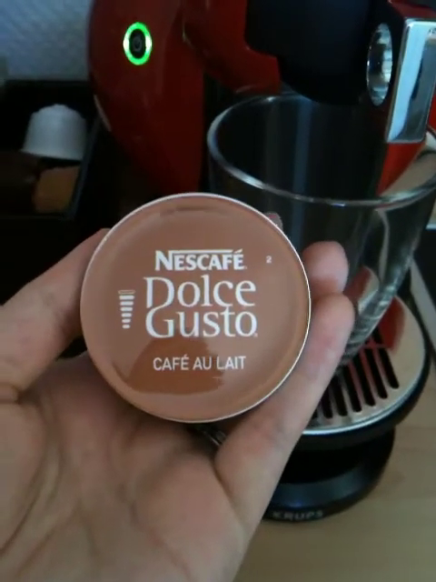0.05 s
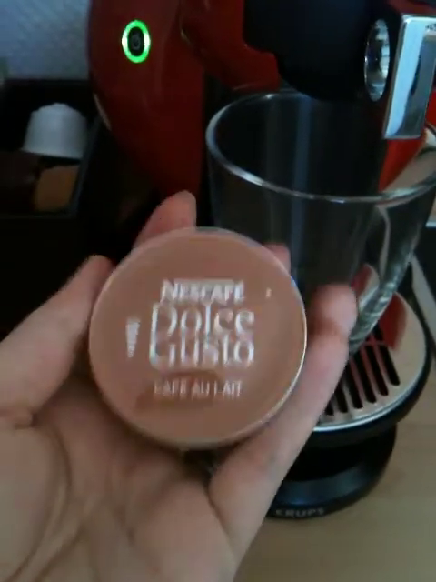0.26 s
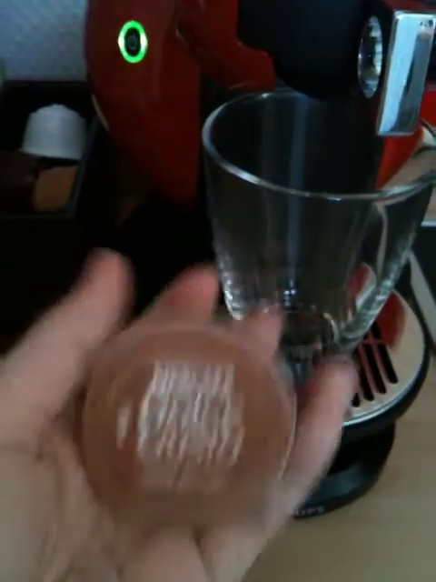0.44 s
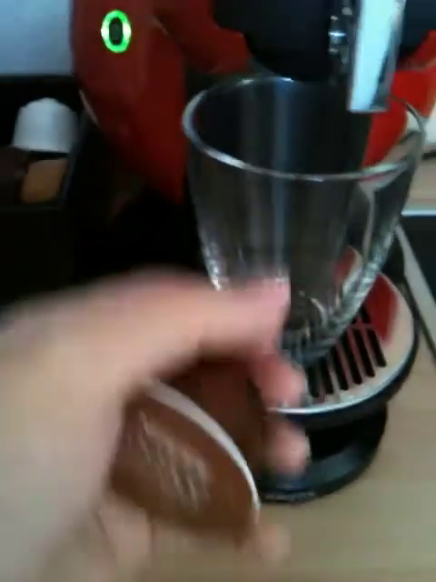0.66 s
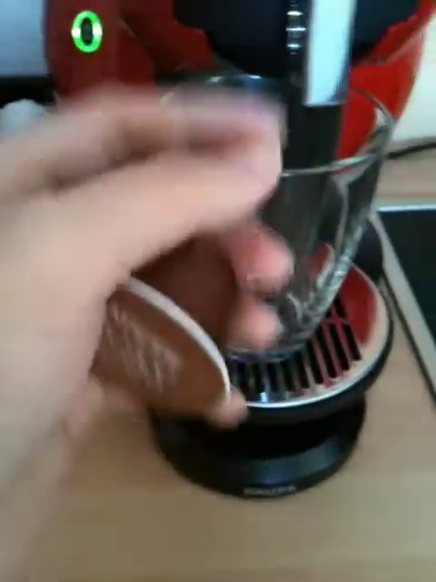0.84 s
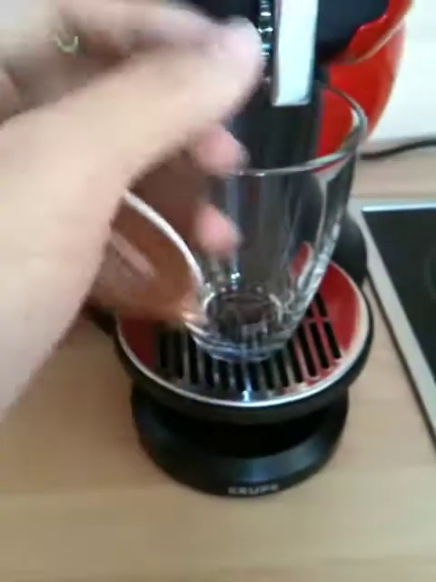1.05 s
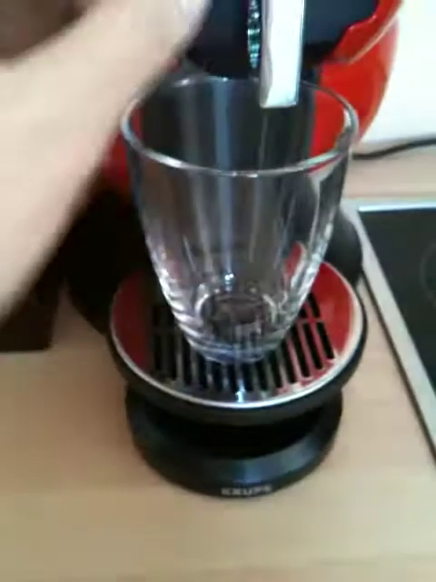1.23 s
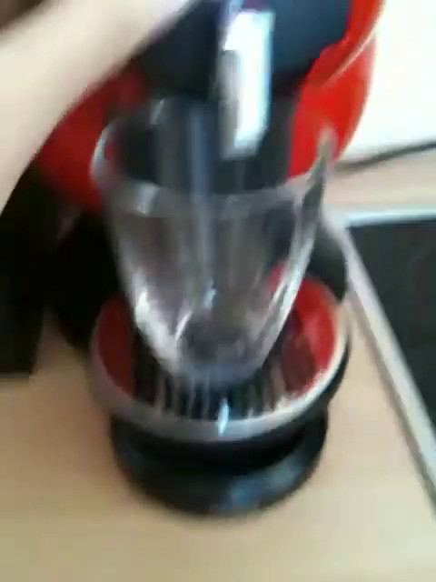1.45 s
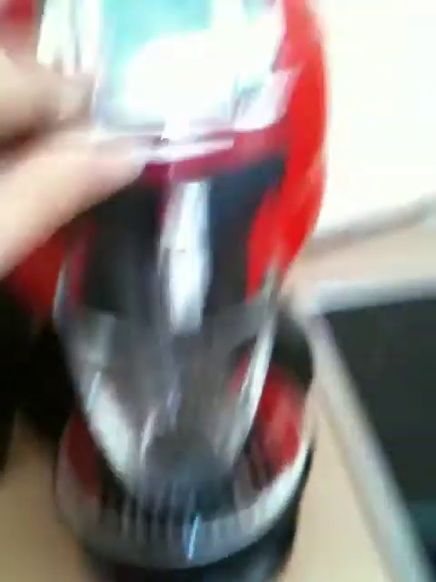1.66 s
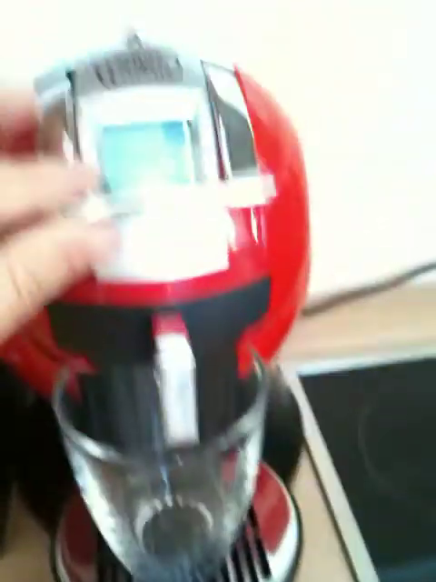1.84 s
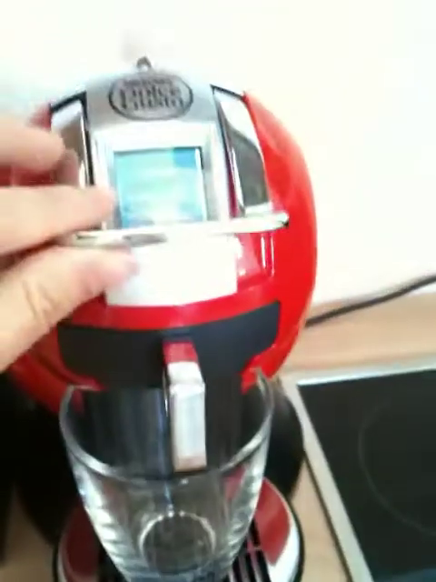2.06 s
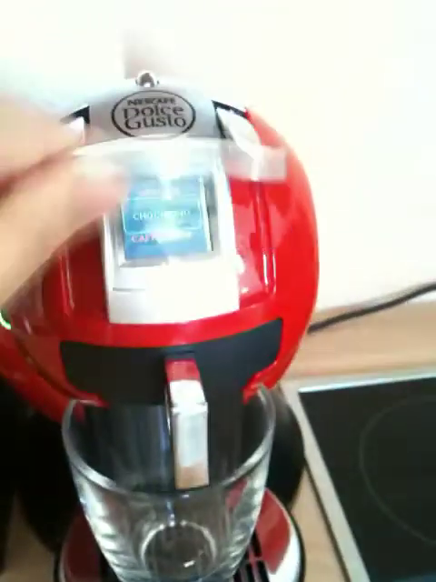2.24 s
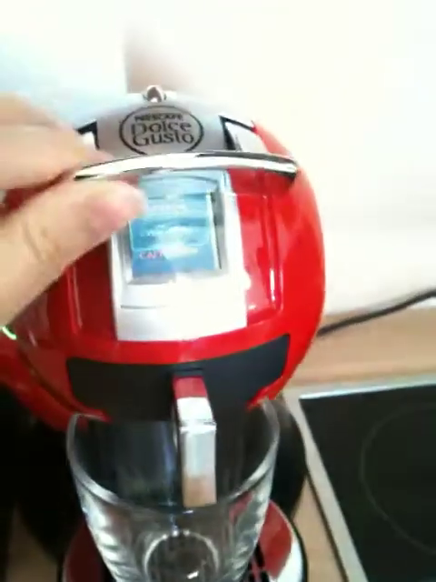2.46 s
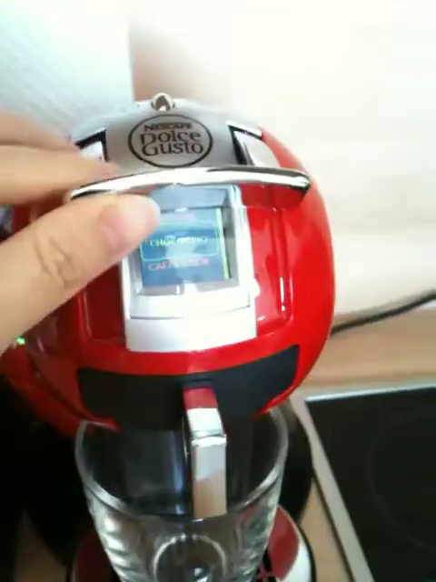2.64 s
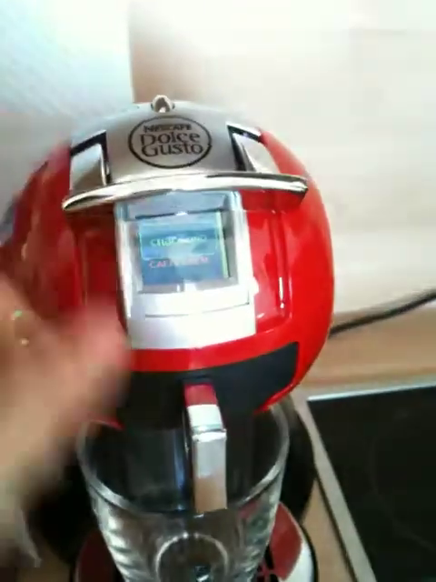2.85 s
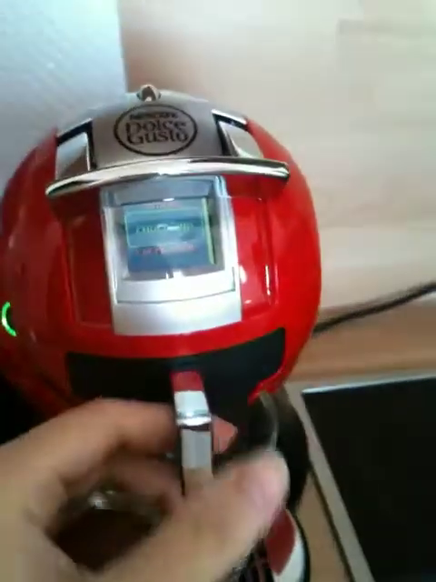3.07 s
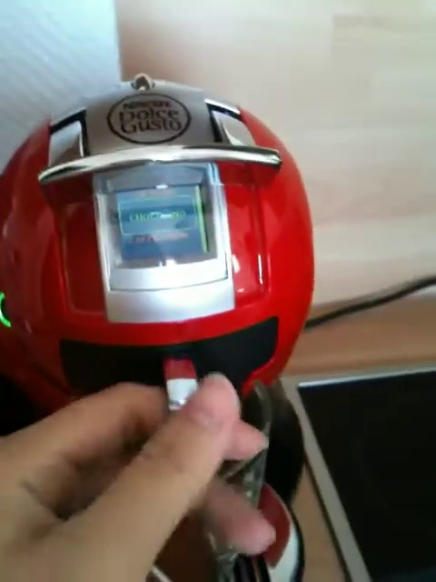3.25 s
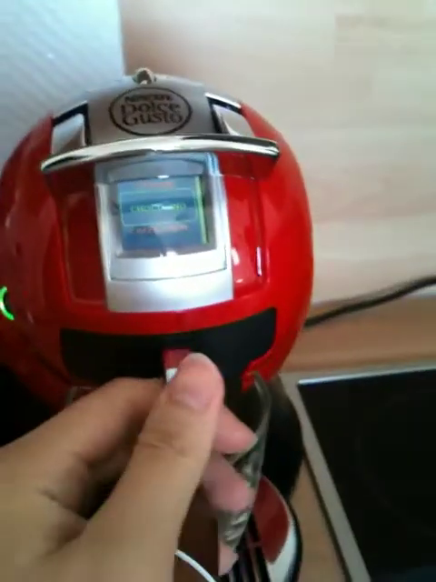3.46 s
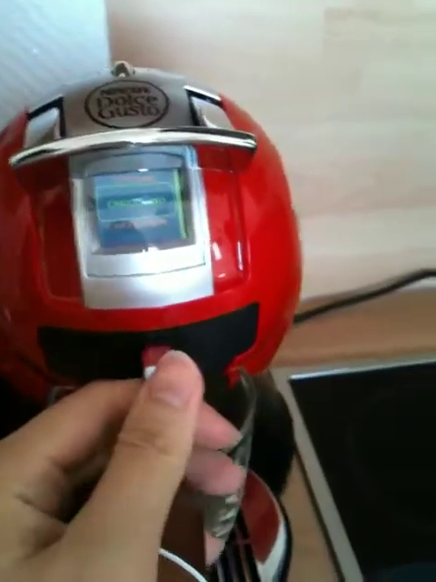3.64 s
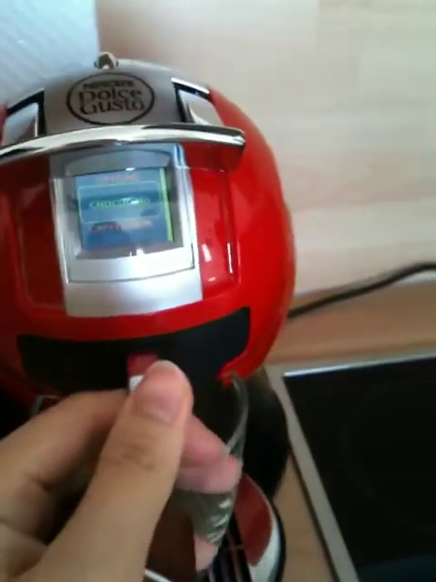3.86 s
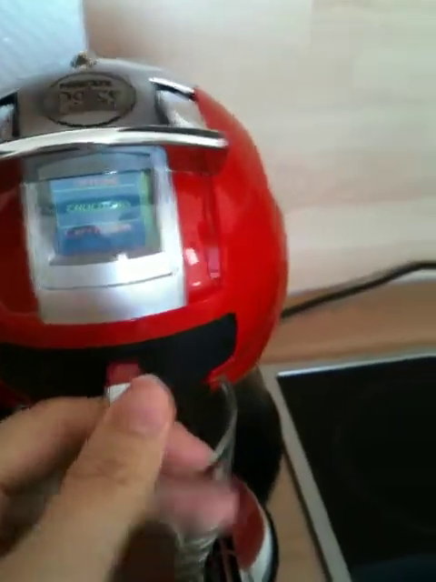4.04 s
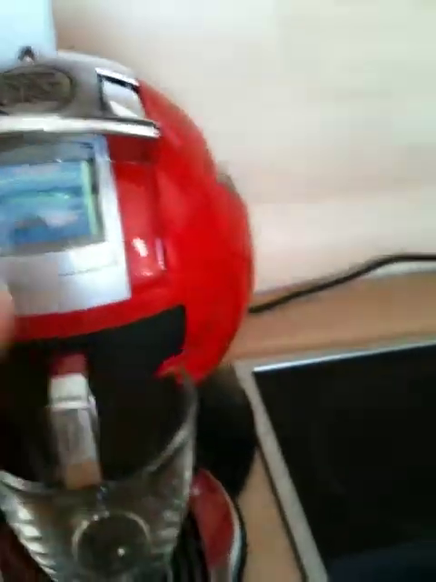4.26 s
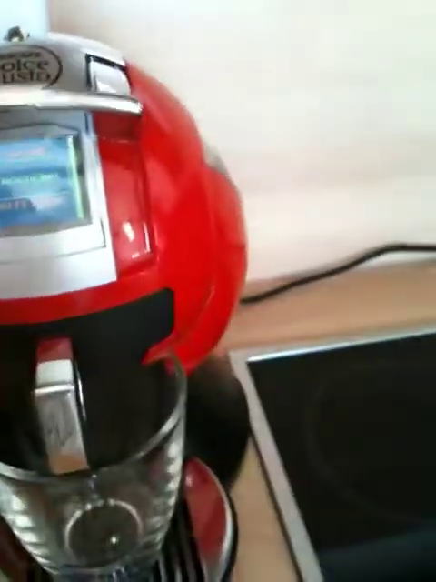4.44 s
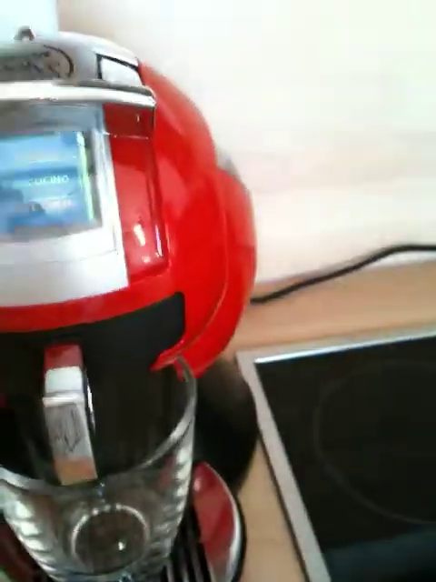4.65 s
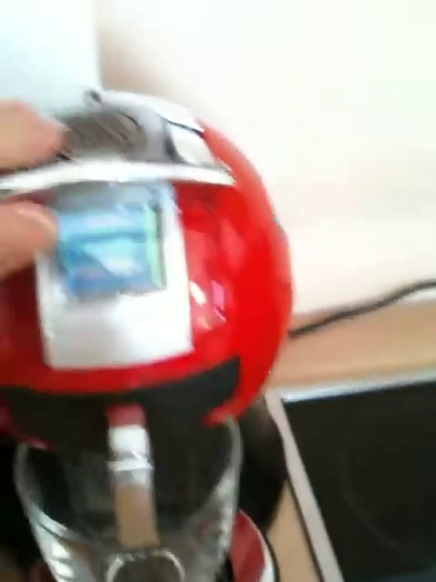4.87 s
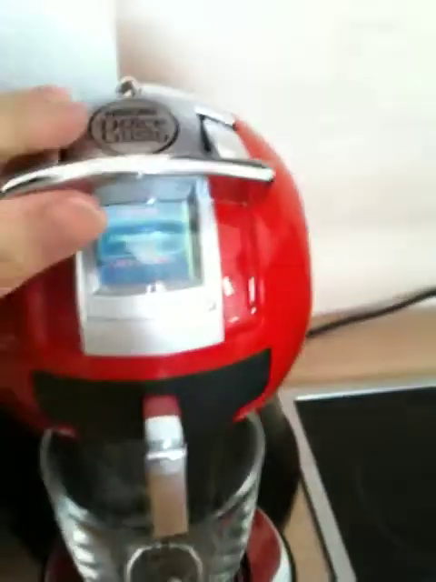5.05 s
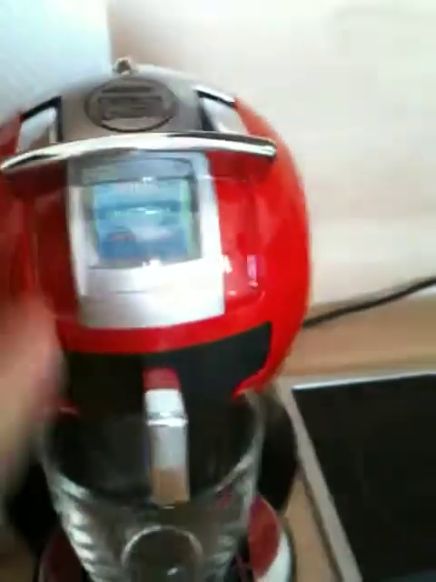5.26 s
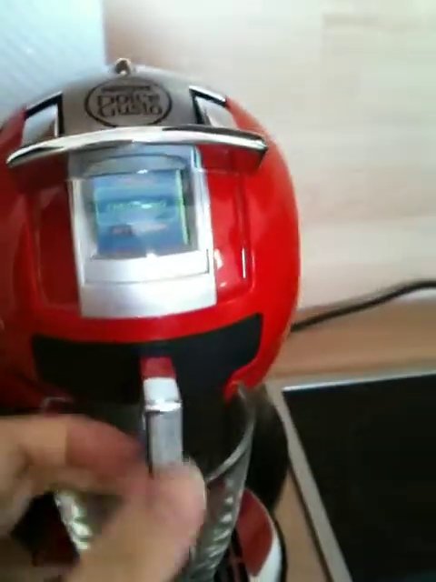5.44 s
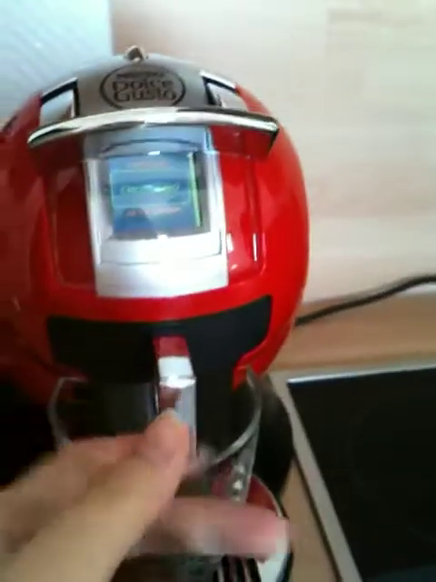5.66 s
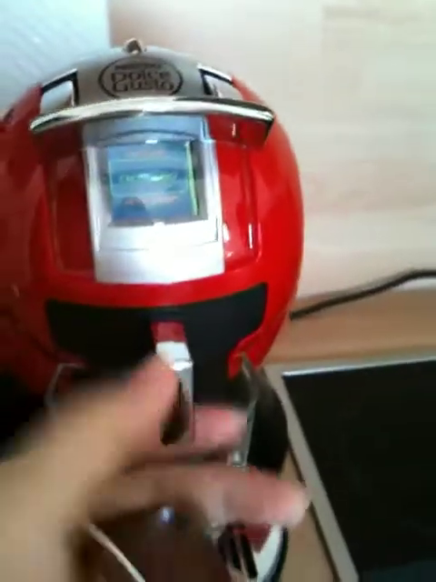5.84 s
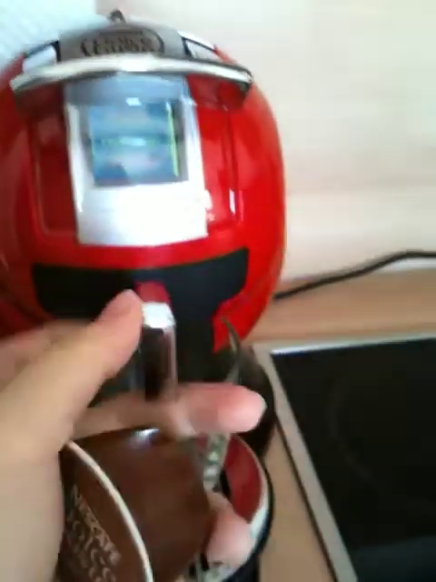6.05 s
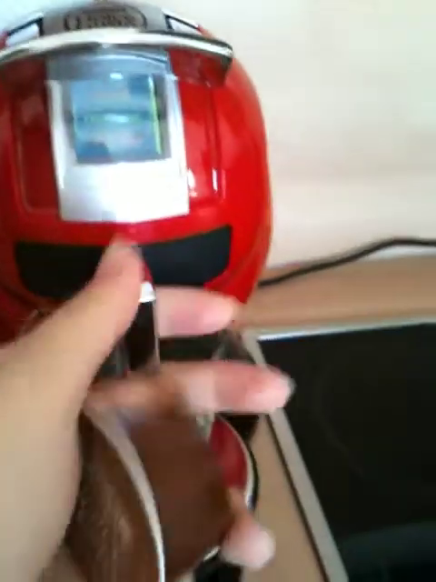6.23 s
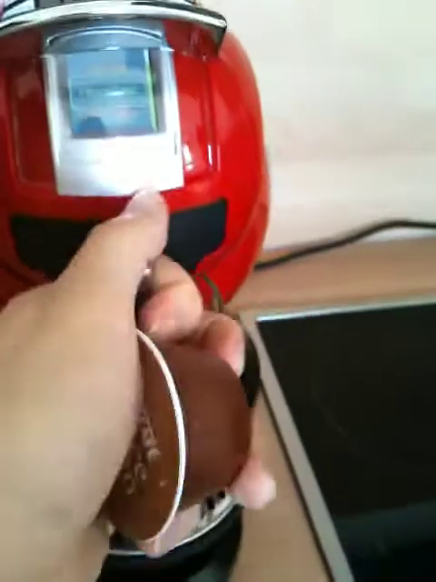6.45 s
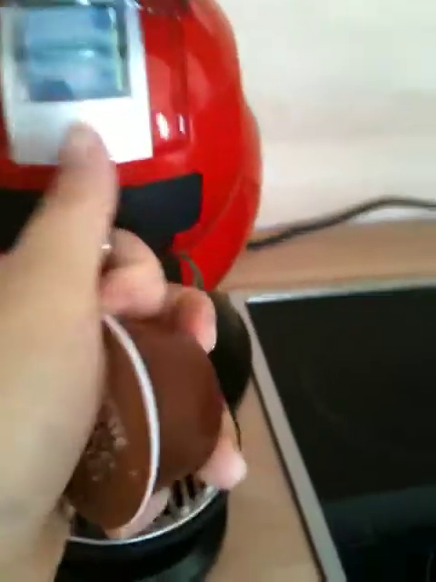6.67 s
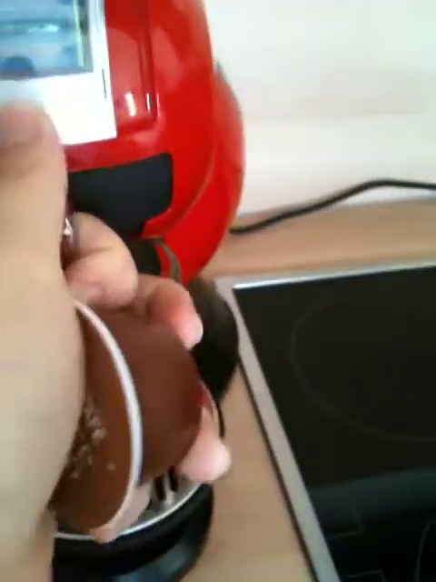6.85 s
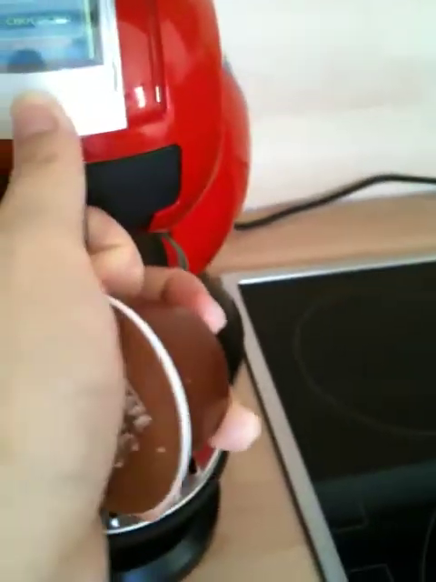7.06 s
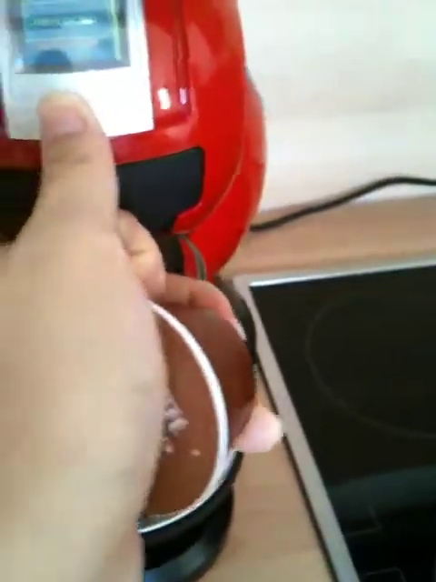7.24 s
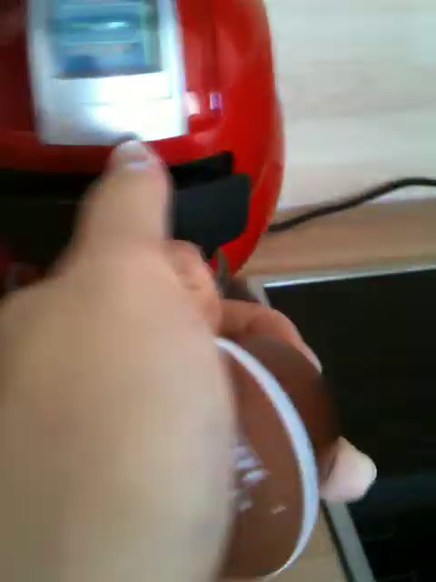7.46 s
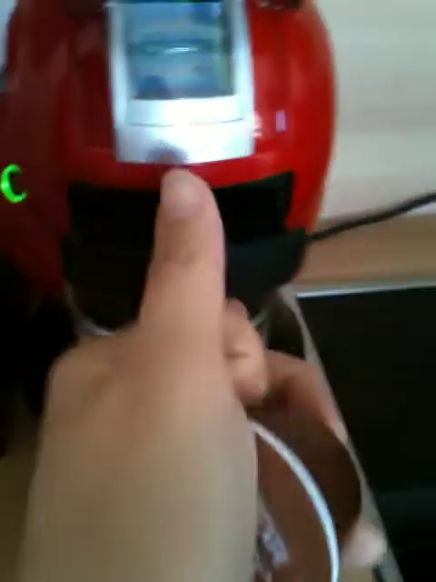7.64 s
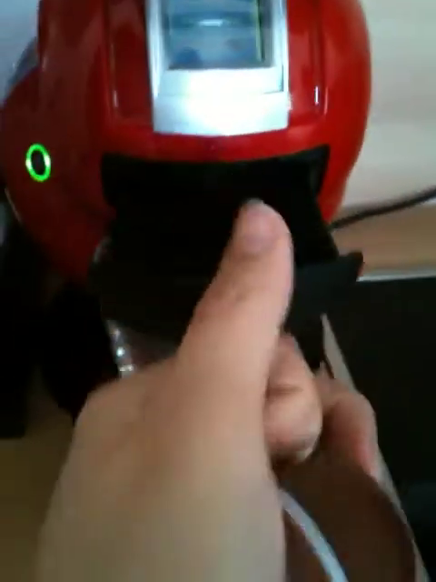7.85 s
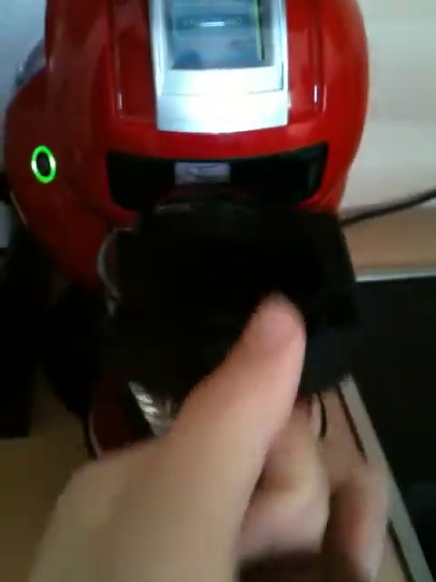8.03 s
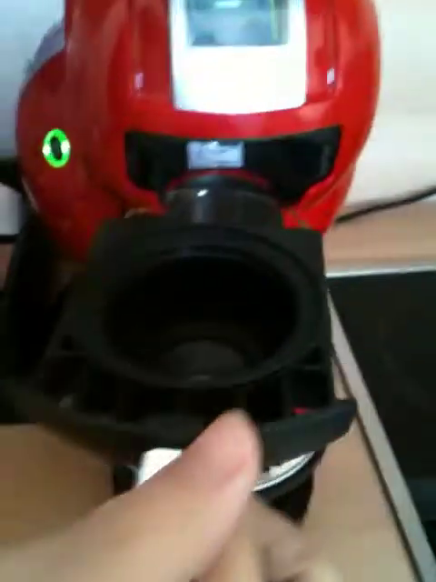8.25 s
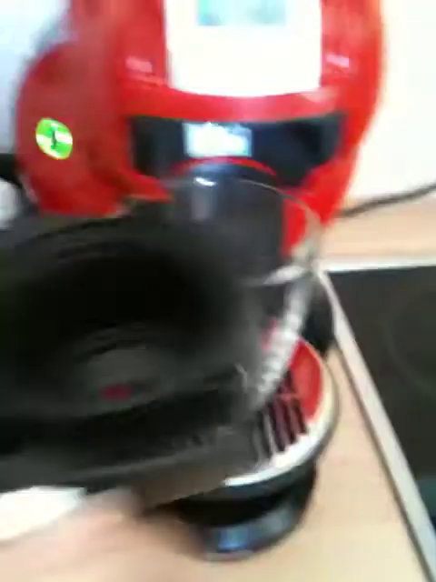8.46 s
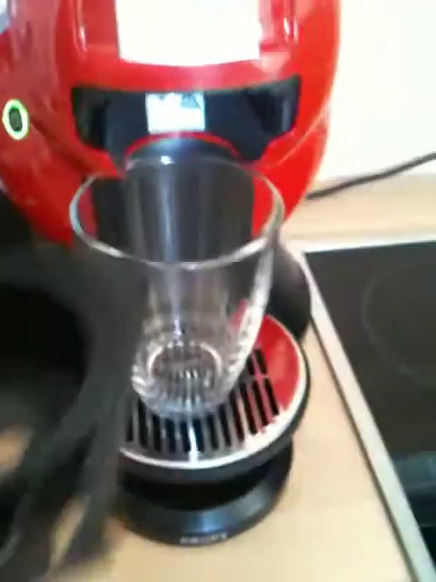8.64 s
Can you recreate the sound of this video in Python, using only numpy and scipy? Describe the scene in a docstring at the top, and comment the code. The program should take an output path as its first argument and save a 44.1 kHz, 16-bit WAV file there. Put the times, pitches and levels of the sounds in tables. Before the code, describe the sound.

A capsule coffee machine is handled very close to the microphone in a quiet kitchen, with faint steady hiss and a short room echo. From 0.3 to 0.9 seconds there are barely audible hand swishes. Light knocks around 1.5 to 1.8 precede a bright, hard plastic clack at 2.3 as the lever flips, with a brief scrape and small rattles. A single rap comes at 3.5, small ticks near 4.3, and faint knocks and rubbing until 6. Around 6.4 to 6.6 crisp clicks and a tiny creak sound as the handle is tried, followed by scattered light ticks and a twangy click at 7.2. At 7.45 the holder snaps loose, the loudest event: a cracking, hollow burst with a low jolt. More snaps and clacks follow at 7.6, then a soft drag, dull knocks at 8.0, and faint brushing to the end at 8.5.

```python
"""Plastic capsule coffee machine worked by hand

Close up in a kitchen, hands brush the machine, flip its top lever and try the holder's handle, which
clicks and scrapes; then the holder snaps free, rattles and slides out, and the machine jolts.
Blows mix a noise crack, damped plastic noise, ringing modes, a pitched ping and a hollow thump;
strokes are noise driven by tiny random slips. A short banded noise echo and a faint steady hiss surround them."""
import sys
import numpy as np
from scipy import signal
from scipy.fft import rfft, irfft
from scipy.io import wavfile

SR = 44100
rng = np.random.default_rng(int(sys.argv[2]) if len(sys.argv) > 2 else 0)


def wav_out(sig):
    """Save sig, one row per channel (or a flat mono array), as 16-bit PCM at SR to the path in sys.argv[1]."""
    wavfile.write(sys.argv[1], SR, np.round(np.clip(np.atleast_2d(sig).T, -1, 1) * 32767).astype(np.int16))


N = 383669  # samples, about 8.7 s

# Blows on lever, handle and holder. Each row: start in seconds, kind of contact, level in dB before the
# common trim, brightness in dB per octave, decay of the damped plastic in seconds (t60),
# thump in dB before the common trim, ping in Hz.
BLOWS = [ (1.543, "rap", -51, -0.5, .05, -73, 1220), (1.751, "click", -65.5, 15, 0.049, -60, 9400),
         (1.791, "knock", -45, 1, 0.033, -66, 720), (1.797, "knock", -46.5, -2.5, .13, -34.5, 1240),
         (1.82, "rap", -37, 1, 0.052, -73, 2660), (2.2887, "clack", -17.5, 1, 0.059, -29.5, 2550),
         (2.316, "clack", -33.5, -1, 0.13, -64, 2860), (2.366, "knock", -37, -0.5, 0.046, -48.5, 800),
         (2.384, "rap", -33, 4.5, .18, -54, 2820), (2.425, "tick", -41, 4.5, 0.087, -70, 2820),
         (2.792, "clack", -48.5, -0.5, 0.12, -57.5, 1410), (3.4791, "rap", -32.5, 0.5, .086, -46, 1025),
         (3.762, "knock", -64, -2.5, 0.03, -78, 1100), (4.2885, "tick", -40.5, -1, 0.092, -76, 3180),
         (4.295, "tick", -44, 2.5, .07, -72, 3230), (4.363, "tick", -37.5, 0.3, 0.05, -70, 3560),
         (4.557, "knock", -50, -1.5, 0.037, -44.5, 770), (4.6276, "knock", -43, 2, 0.032, -63, 1040),
         (4.7283, "click", -41, 0, 0.057, -73, 1530), (4.889, "tick", -55.5, 5.5, 0.061, -79, 4400),
         (5.226, "knock", -64, 8, .08, -50.5, 2770), (5.503, "knock", -56, -1, 0.038, -52, 1020),
         (5.849, "tap", -63.5, 0, 0.046, -74, 1900), (6.417, "tick", -35.5, 0, 0.078, -43.5, 2970),
         (6.478, "tick", -39, -1, .04, -70, 3750), (6.506, "tick", -37, -1.5, 0.031, -72, 3700),
         (6.5461, "click", -29, 2, 0.098, -65, 3500), (6.701, "knock", -48, 2.5, 0.09, -58, 3020),
         (6.806, "rap", -43, 0, 0.11, -67, 3140), (6.914, "tap", -57, -0.5, 0.035, -66, 1200),
         (7.0113, "tick", -40, .5, .084, -74, 2970), (7.1246, "tap", -50, -0.5, 0.052, -56.5, 1350),
         (7.1818, "twang", -31.5, 0, 0.041, -68, 2440), (7.366, "tick", -47.5, 1, 0.038, -73.5, 3840),
         (7.378, "tick", -42.5, 5, 0.057, -76, 4380), (7.4471, "click", -25, 1.5, 0.057, -58, 1520),
         (7.4495, "snap", -15, 1.5, .038, -20, 1416), (7.457, "rap", -10.5, -0.5, .17, -27, 1370),
         (7.4796, "snap", -21, -1.5, 0.1, -23.5, 2090), (7.615, "snap", -27.5, -1.5, 0.053, -55, 2570),
         (7.622, "clack", -32.5, -5, 0.18, -38.5, 2525), (7.707, "tap", -54, -5, 0.035, -61, 1380),
         (7.856, "tap", -45, -0.5, 0.057, -66, 1183), (7.902, "knock", -61, -5.5, .044, -68, 1080),
         (8.006, "clack", -41.5, -3.5, 0.043, -50, 790), (8.038, "rap", -33.5, -4, .083, -39.5, 1200)]
# Strokes of skin and parts along the plastic. Each row: start in seconds, end in seconds, kind of sliding,
# level in dB before colour, brightness in dB per octave, body rumble in dB.
STROKES = [(0.279, 0.57, "swish", -57.5, 2.5, -94), (.667, .767, "swish", -58, 12.5, -82),
           (0.786, .944, "swish", -54.5, -6, -82), (1.626, 1.669, "drag", -69, -3.5, -71),
           (1.746, 1.82, "drag", -56.5, 3, -78), (2.275, 2.299, "scrape", -26, -1, -57),
           (2.294, 2.446, "scrape", -51.5, -5, -66), (2.785, 2.858, "drag", -64, 1, -67),
           (4.538, 4.584, "drag", -58, -2.5, -56), (5.184, 5.268, "drag", -61, 1, -68),
           (5.211, 5.36, "swish", -50, -0.5, -81), (5.496, 5.578, "scrape", -65, 5, -67),
           (5.76, 5.914, "drag", -63.5, 2, -75), (6.03, 6.14, "swish", -57.5, 3, -77.5),
           (6.173, 6.34, "scrape", -64, 9.5, -77), (6.419, 6.566, "scrape", -46.5, 2, -77),
           (6.469, 6.517, "creak", -41, 1.5, -81), (7.729, 7.993, "drag", -54.5, -.5, -58.5),
           (7.933, 8.054, "scrape", -49, -4.5, -57), (8.187, 8.383, "swish", -57, 4, -99),
           (8.362, 8.522, "swish", -51.5, 4, -95)]
# Modes of the hollow body. Each row: frequency in Hz, relative level in dB, t60 in seconds.
BODY_MODES = [(266, -27, 0.16), (280, -21, .25), (287.4, 8, 0.12), (319.4, 2.5, 0.51), (408, 0, 0.19)]
# Longer rings of the stiff shell. Each row: frequency in Hz before detuning, relative level in dB, t60 in seconds.
SHELL_MODES = [(810, 1, 0.16), (1165, 14.5, 0.046), (1178, 6, 0.18), (1427, 3.5, 0.14), (1470, -6.5, 0.086),
               (1720, -19, .25), (1895, -4, 0.26), (2010, -15, .3), (1960, 5.5, 0.21), (2410, -14.5, 0.239),
               (2790, 5.5, 0.1), (2740, -1.5, 0.073), (3000, -16, .3), (3340, -5.5, 0.43), (3773, 7, 0.24),
               (4890, -4, .25), (5200, 6.5, 0.11), (4943, -17, 0.12)]
# Bands of the kitchen's echo. Each row: centre in Hz, t60 in seconds, gain in dB.
ECHO_BANDS = [(150, 0.3, -10), (406, 0.46, -8), (1210, 0.39, -12), (3070, 0.52, -9), (6000, 0.34, -7.5),
              (12000, 0.47, -16)]
# Spectrum of the background. Each row: frequency in Hz, relative density in dB per Hz.
HISS_SPECTRUM = [(30, -30.5), (70, -23.5), (100, -4), (145, -5), (290, 1.5), (480, -7.5), (720, -5.5),
                 (1000, -10.5), (1700, -12.5), (2950, -1), (3900, -6.5), (4800, -13), (8400, -20),
                 (12000, -25)]
# Modes of a small struck part. Each row: multiple of its ping pitch, relative level in dB, t60 in seconds.
PART_MODES = [(1, 2.5, 0.043), (1.09, -5.5, .025), (.6, -11, 0.048), (1.43, -13, .035)]
# Kinds of contact, by name. Each row: base colour near 750 Hz, 1.45 kHz, 5 kHz and 8.2 kHz in dB against 3.1 kHz,
# thump in Hz, thump t60 in seconds, ping in dB against the blow's level.
CONTACT_KINDS = {"tick": (-11, -8, -8, -11, 346, 0.1, -6.5), "click": (-8, 3, -7, -5.5, 297.5, 0.1, -5.5),
                 "twang": (-12, -1, -8, -13, 268.5, 0.1, -3.5), "rap": (-9, -7, -15, -17.5, 290, 0.02, -11),
                 "clack": (-7, -0.5, -19.5, -21, 284, 0.12, -4.5),
                 "knock": (8, 3, -15, -17, 278.5, 0.16, -7.5), "tap": (2.5, 9, -20.5, -19, 301, 0.1, 3),
                 "snap": (1, 0.5, 3.5, -13.5, 288, 0.1, -3)}
# Kinds of sliding, by name. Each row: base colour at the same four points in dB,
# resonance in Hz, added resonance in dB, mean slips per second.
SLIDING_KINDS = {"swish": (-25, -20.5, -10, -20.5, 2800, 0.5, 1500),
                 "scrape": (-5, -3.5, -5.5, -15, 2907, -3.5, 1300),
                 "creak": (-2, -3.5, -5.5, -10, 3902, 12.5, 900),
                 "drag": (11, 2.5, -10.5, -15.5, 1198, -9.5, 806)}
# Where brightness acts. Each entry: distance of a colour point from 3.1 kHz in octaves.
COLOUR_POINT_OCTAVES = np.log2(np.array([750, 1450, 4950, 8200]) / 3100)

HISS_DB = -64  # RMS against full scale
TOP_HZ = 15800  # upper edge of the final sound
T = np.arange(int(.6 * SR)) / SR  # time axis in seconds for each decaying sound
# the jolt of the holder's release shakes the machine on the worktop
JOLT_S, JOLT_HZ, JOLT_DB, JOLT_T60_S, JOLT_RISE_S = 7.45, 60, -37.5, 0.11, .008


def undb(db):
    """Decibels to gain."""
    return 10 ** (np.asarray(db) / 20)


def unit(x):
    """Scale to an energy of one."""
    return x / np.sqrt(np.sum(x ** 2))


def fade(t60):
    """Free decay, 60 dB down after t60 seconds."""
    return np.exp(-np.log(1000) * T / max(t60, 1e-3))


def add(out, start_s, x):
    """Mix x into out from a start time."""
    i = int(start_s * SR)
    out[i:i + len(x)] += x[:N - i]


def colour(x, points, size=2048):
    """Causal minimum-phase filter through (Hz, dB) points, joined on a log frequency axis."""
    hz, db = np.transpose(points)
    grid = np.maximum(np.fft.rfftfreq(size, 1 / SR), 1)
    gain = undb(np.interp(np.log(grid), np.log(hz), db))
    # folding the cepstrum forward puts the whole response after the onset
    cepstrum = irfft(np.log(gain))
    cepstrum[1:size // 2] *= 2
    cepstrum[size // 2 + 1:] = 0
    response = irfft(np.exp(rfft(cepstrum)))
    return signal.fftconvolve(x, response)[:len(x)]


def resonate(x, hz, q, db):
    """Add one narrow resonance to a sound."""
    peak = signal.lfilter(*signal.iirpeak(hz, q, fs=SR), x)
    return x + undb(db) * peak


def hiss():
    """Steady room and microphone noise, with a slight treble resonance."""
    noise = colour(rng.standard_normal(N), HISS_SPECTRUM)
    noise = resonate(noise, 9700, q=7, db=-3)
    return unit(noise) * np.sqrt(N) * undb(HISS_DB)


def plastic(x, low_db, mid_db, high_db, top_db):
    """Colour of a contact point: weak bass, falling off below 60 Hz, small peak near 10 kHz, dull above."""
    bass_db = min(low_db, 0)
    return colour(x, [
        (30, bass_db - 22.5), (62, bass_db - 13), (125, bass_db - 12),
        (430, low_db + 2.5), (560, low_db - 4.0), (750, low_db - 1.5),
        (1450, mid_db), (3100, 0.0058), (4950, high_db),
        (5900, (high_db + top_db) / 2 - 0.5), (8200, top_db - 2),
        (10200, top_db + 1.0), (11600, top_db - 12.5), (16000, top_db - 13.5)])


def tilted(tone, brightness):
    """A harder touch tips the colour towards the treble, about 3.1 kHz."""
    return np.array(tone) + brightness * COLOUR_POINT_OCTAVES


def rubs(scatter_db=3, slip_t60=0.029, sing_q=10):
    """Many tiny uneven slips, swelling and dying with the stroke, make the rubbed part sing and the body rumble."""
    out = np.zeros(N)
    for start, end, kind, db, brightness, rumble_db in STROKES:
        *tone, sing_hz, sing_db, slips_per_s = SLIDING_KINDS[kind]
        n = int((end - start) * SR)
        # slips fall at random, at least one per stroke
        chance = rng.random(n)
        slipping = chance <= max(slips_per_s / SR, chance.min())
        slips = slipping * undb(scatter_db * rng.standard_normal(n))
        # each slip leaves a short burst whose energy dies away
        energy = signal.fftconvolve(slips ** 2 * np.hanning(n), fade(slip_t60) ** 2)
        strength = np.sqrt(np.abs(energy))
        grit = unit(strength * rng.standard_normal(len(strength))) * np.sqrt(n)
        scrape = plastic(grit, *tilted(tone, brightness))
        scrape = resonate(scrape, sing_hz, sing_q, sing_db)
        rumble = colour(grit, [(100, -49), (220, -19.0), (290, 2.0), (350, 1),
                               (440, -3.0), (600, -11.0), (2000, -68.0)])
        rumble = unit(rumble) * np.sqrt(n)
        add(out, start, undb(db) * scrape + undb(rumble_db) * rumble)
    return out


def kitchen(x, build_s=.012):
    """Diffuse echo from worktop and walls: noise bands build up quickly and die at their own rates."""
    hz, t60s, dbs = np.transpose(ECHO_BANDS)
    noise = rfft(rng.standard_normal(len(T)))
    grid = np.log(np.maximum(np.fft.rfftfreq(len(T), 1 / SR), 1))
    build = 1 - np.exp(-(T / build_s) ** 2)
    echo = 0
    # each share is one at its own band centre and zero at the others, so the bands crossfade
    for share, t60, db in zip(np.eye(len(hz)), t60s, dbs):
        band = irfft(noise * np.interp(grid, np.log(hz), share), len(T))
        echo = echo + undb(db) * band * unit(fade(t60) * build)
    return signal.fftconvolve(x, echo)[:N]


def ring(modes, detune=0.0062):
    """Decaying modes; each contact meets them with other phases, and the grip bends their pitch a little."""
    total = 0
    for hz, db, t60 in modes:
        bent_hz = hz * (1 + detune * rng.standard_normal())
        phase = rng.random()  # in cycles
        total = total + undb(db) * fade(t60) * np.sin(2 * np.pi * (bent_hz * T + phase))
    return unit(total)


def contact(t60, soft, crack_t60=0.01, crack_db=-1, shell_db=-11, rise_s=0.0008,
            blow_s=0.013, free_t60=0.36, damp_hz=10500):
    """A sharp crack, a crowd of damped plastic modes, and the shell's few longer rings."""
    crack, crowd = rng.choice([-1., 1.], (2, len(T)))
    crack = crack * unit(fade(crack_t60))
    # plastic swallows the top of the treble at once: only the crack keeps it
    crowd = signal.lfilter(*signal.butter(2, damp_hz, fs=SR), crowd) * unit(fade(t60))
    # a part that is held tight rings shortly and passes less to the shell
    shell = undb(shell_db) * np.sqrt(t60 / free_t60) * ring(SHELL_MODES)
    # a softer contact is a longer push
    push = 1 - np.exp(-(T / (rise_s * soft)) ** 2)
    x = push * (undb(crack_db) * crack + crowd + shell)
    # the first blow_s seconds get an RMS of one
    return x / np.sqrt(np.mean(x[:int(blow_s * SR)] ** 2))


def thump(hz, t60, rise_s=0.0041, hum_db=-17):
    """The panel swings at its own pitch and leaves the hollow body humming."""
    swing = fade(t60) * np.sin(2 * np.pi * hz * T)
    hum = sum(undb(db) * fade(life) * np.sin(2 * np.pi * f * T) for f, db, life in BODY_MODES)
    hum = hum / np.abs(hum).max()
    return (1 - np.exp(-T / rise_s)) * (swing + undb(hum_db) * hum)


def ping(hz, rise_s=0.0013):
    """The small part that is struck rings briefly at its own modes."""
    modes = sum(undb(db) * fade(t60) * np.sin(2 * np.pi * hz * ratio * T) for ratio, db, t60 in PART_MODES)
    return (1 - np.exp(-T / rise_s)) * modes


def knocks(contact_trim_db=-2, thump_trim_db=5.5):
    """Each blow sounds the struck part, the shell and the hollow body."""
    out = np.zeros(N)
    for start, kind, db, brightness, t60, thump_db, ping_hz in BLOWS:
        *tone, thump_hz, thump_t60, ping_db = CONTACT_KINDS[kind]
        low, mid, high, top = tilted(tone, brightness)
        # a bass-heavy colour goes with a softer push
        strike = plastic(contact(t60, soft=undb(max(low, 0))), low, mid, high, top)
        add(out, start, undb(db + contact_trim_db) * strike)
        add(out, start, undb(thump_db + thump_trim_db) * thump(thump_hz, thump_t60))
        add(out, start, undb(db + ping_db) * ping(ping_hz))
    return out


def jolt():
    """The whole machine bounces on its feet: one low, quickly damped swing."""
    out = np.zeros(N)
    envelope = (1 - np.exp(-T / JOLT_RISE_S)) * fade(JOLT_T60_S)
    add(out, JOLT_S, undb(JOLT_DB) * envelope * np.sin(2 * np.pi * JOLT_HZ * T))
    return out


def scene():
    """The machine, its echo and the background."""
    machine = rubs() + knocks() + jolt()
    return (machine + kitchen(machine) + hiss())[None]


def record(dry):
    """A steep elliptic low-pass cuts the top of the treble."""
    low_pass = signal.ellip(10, .2, 80, TOP_HZ, fs=SR, output="sos")  # 0.2 dB ripple, 80 dB stop band
    return signal.sosfilt(low_pass, dry)


dry = scene()
out = record(dry)
wav_out(out)
```